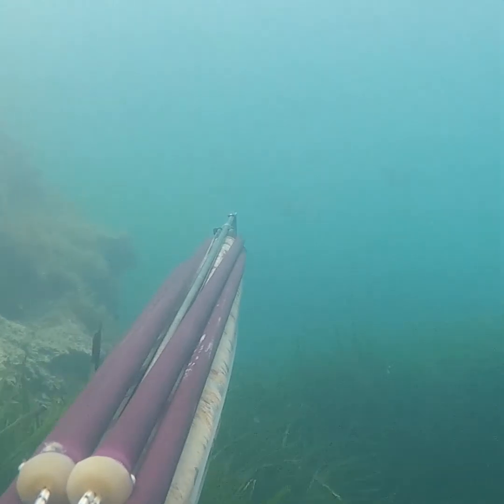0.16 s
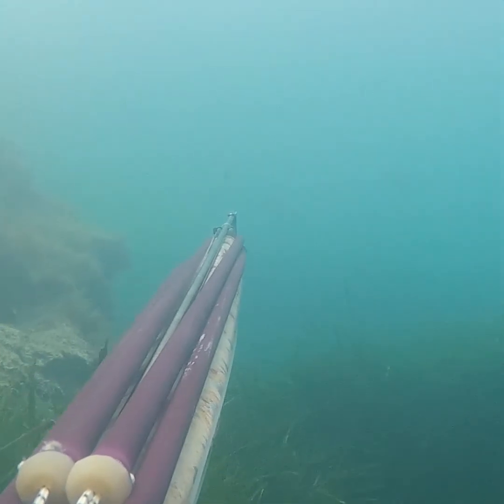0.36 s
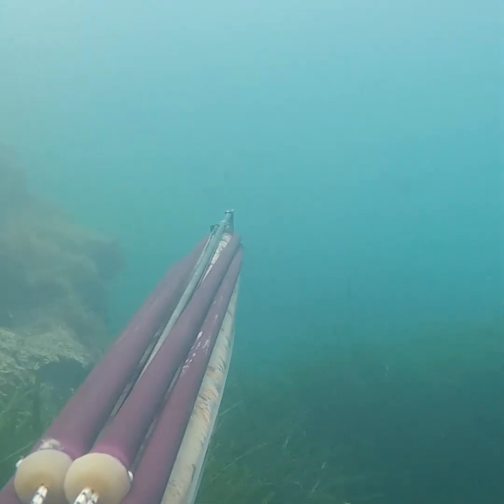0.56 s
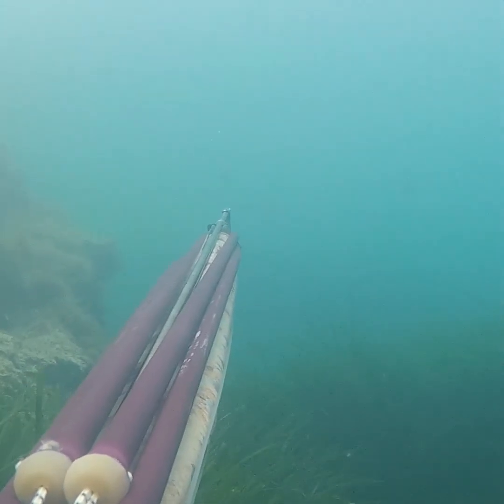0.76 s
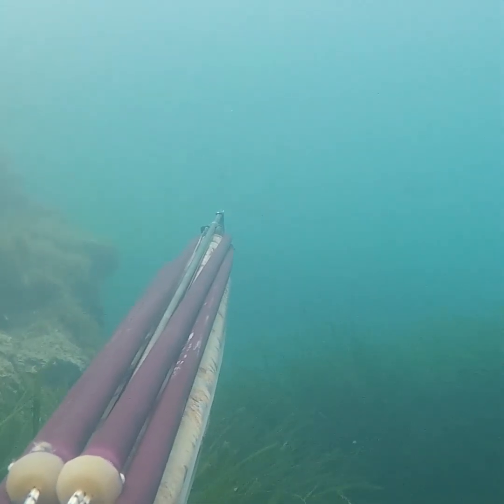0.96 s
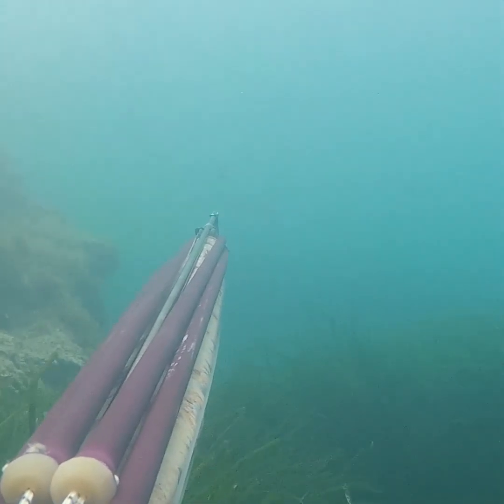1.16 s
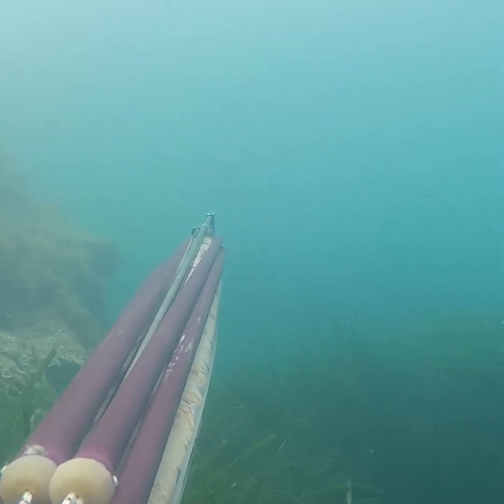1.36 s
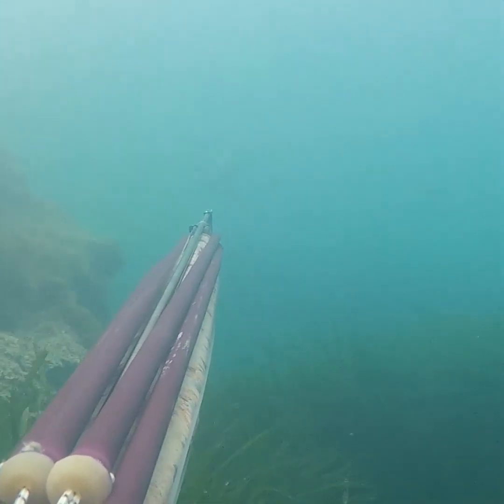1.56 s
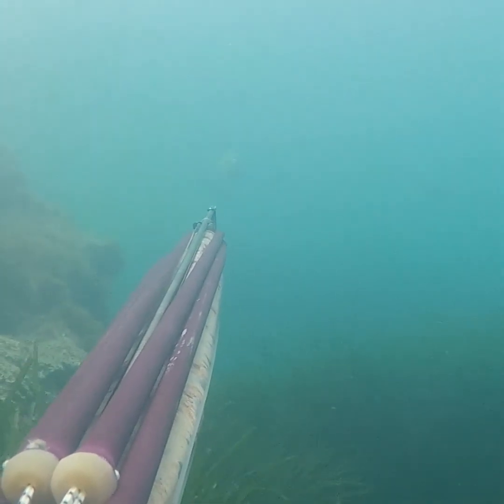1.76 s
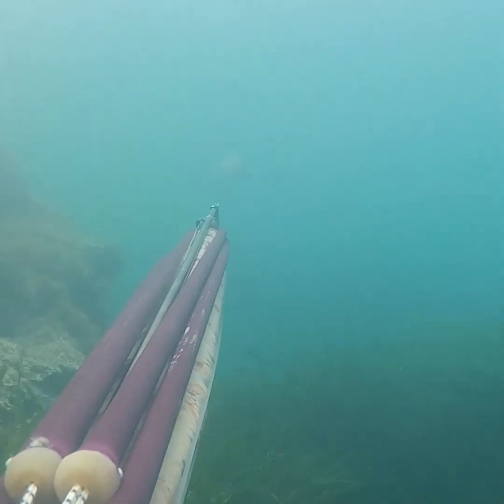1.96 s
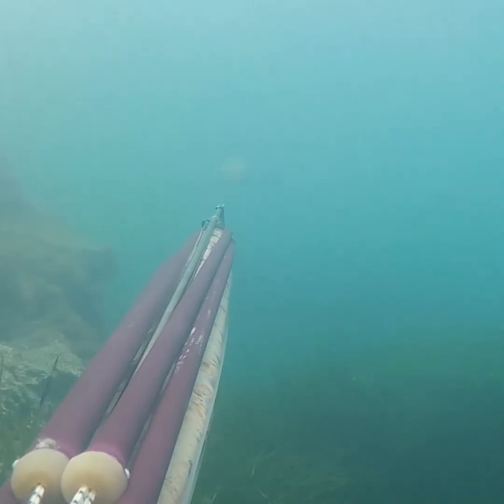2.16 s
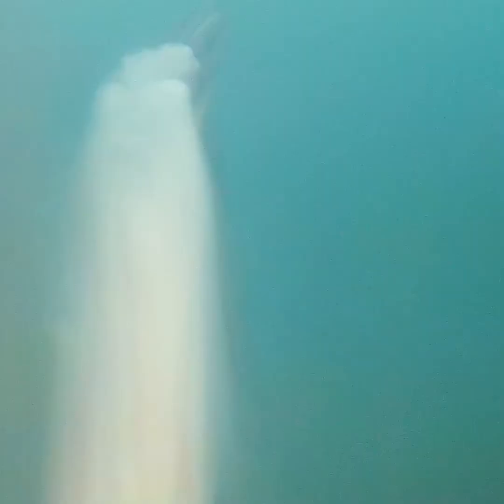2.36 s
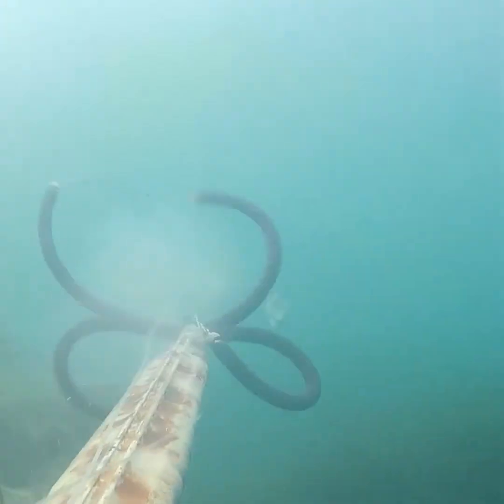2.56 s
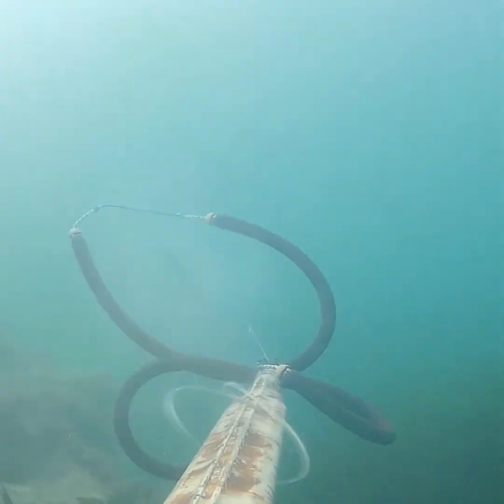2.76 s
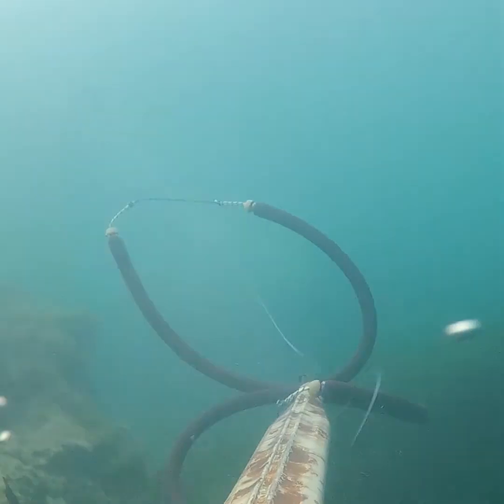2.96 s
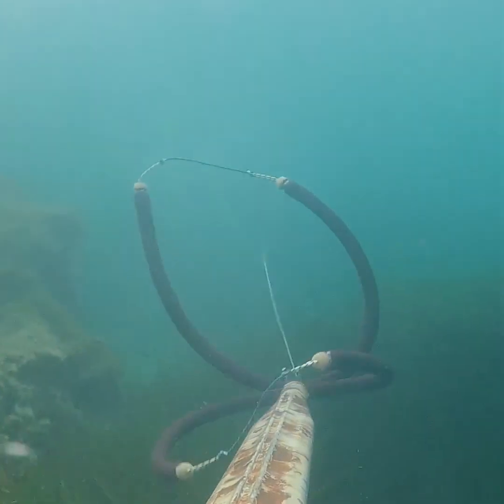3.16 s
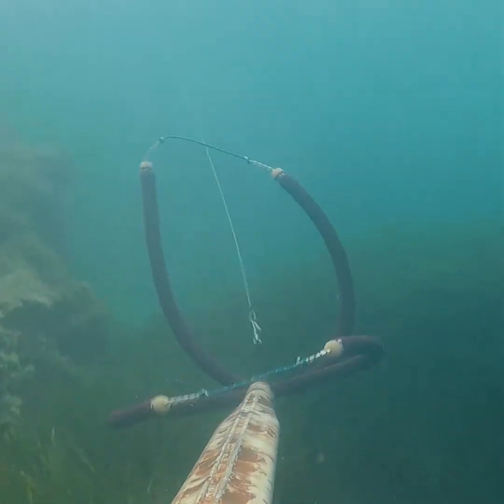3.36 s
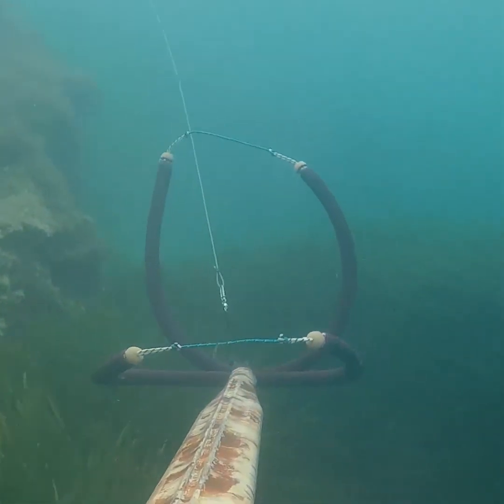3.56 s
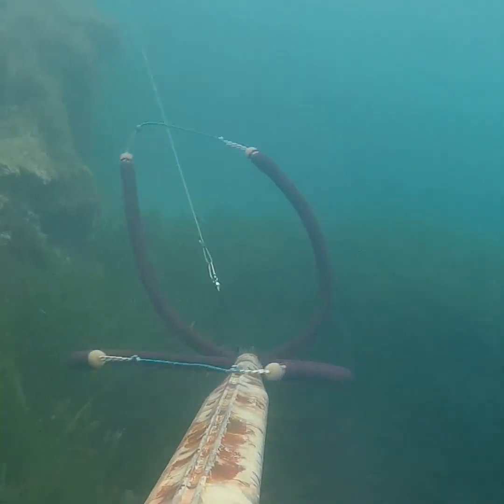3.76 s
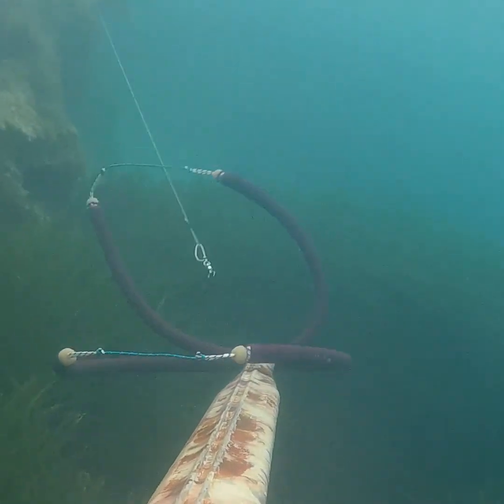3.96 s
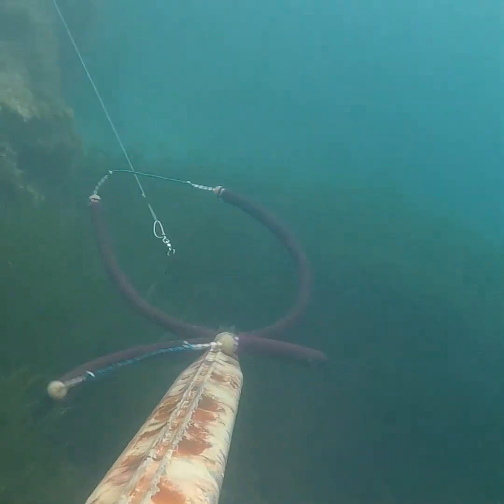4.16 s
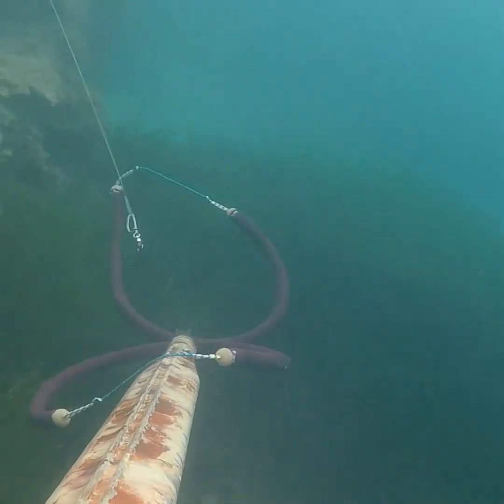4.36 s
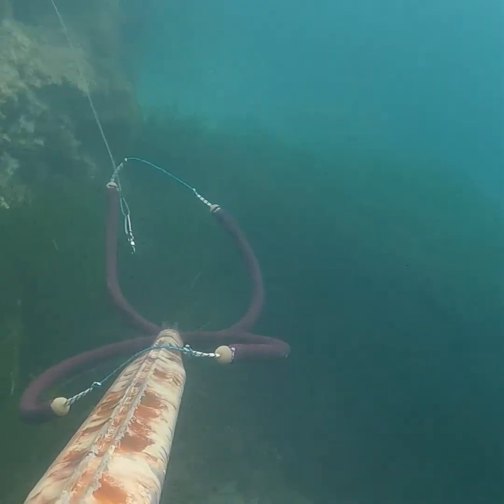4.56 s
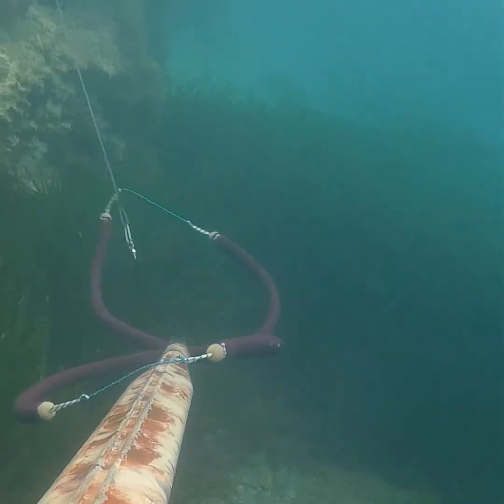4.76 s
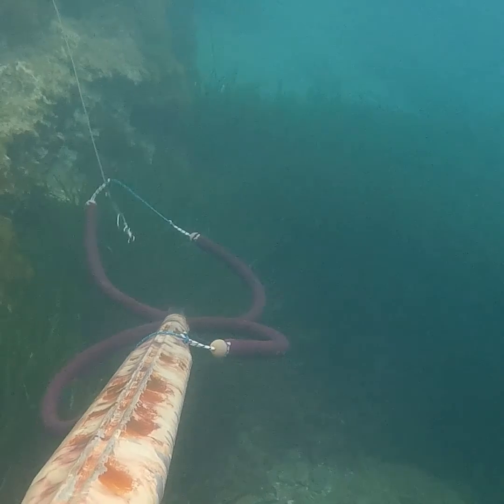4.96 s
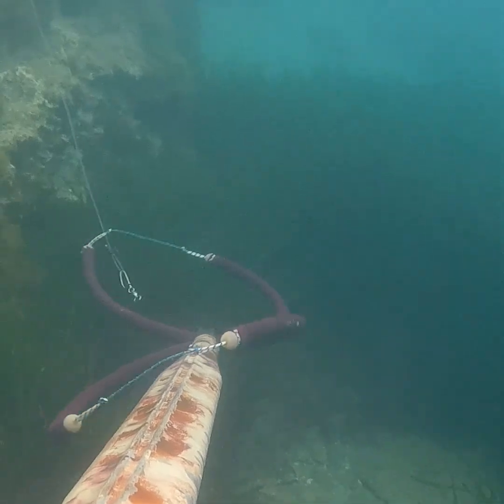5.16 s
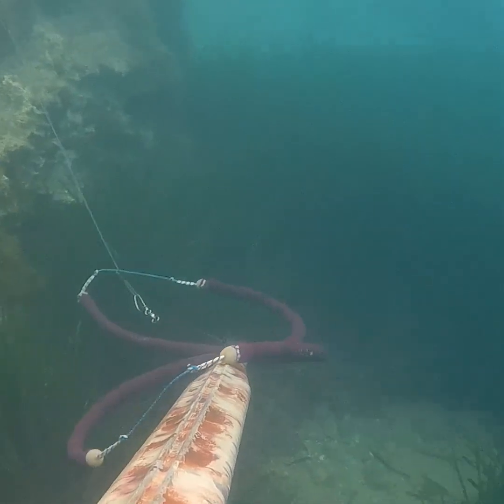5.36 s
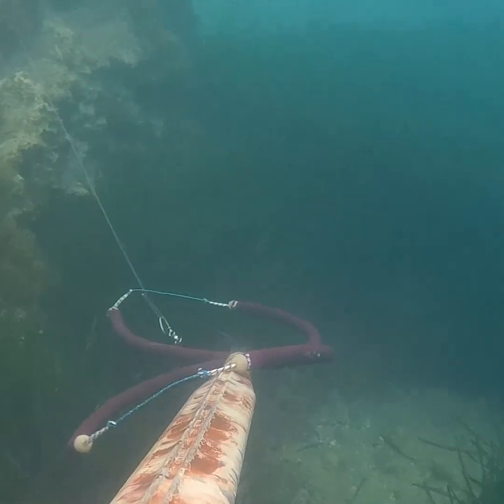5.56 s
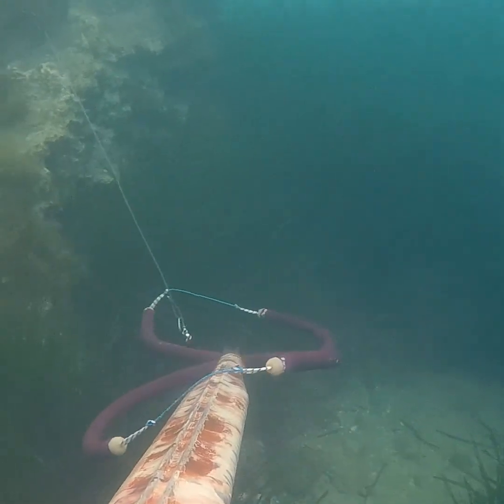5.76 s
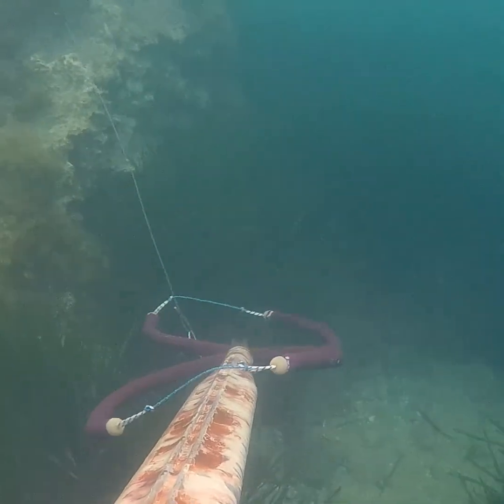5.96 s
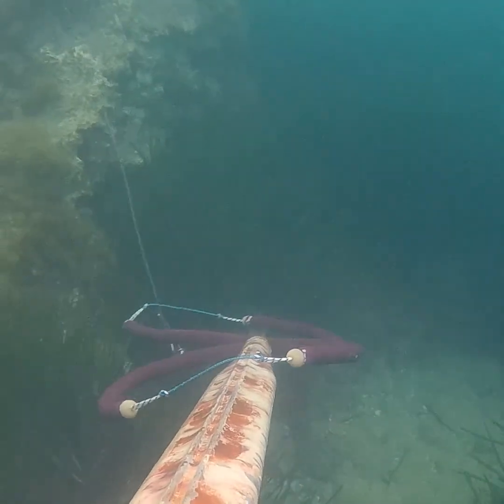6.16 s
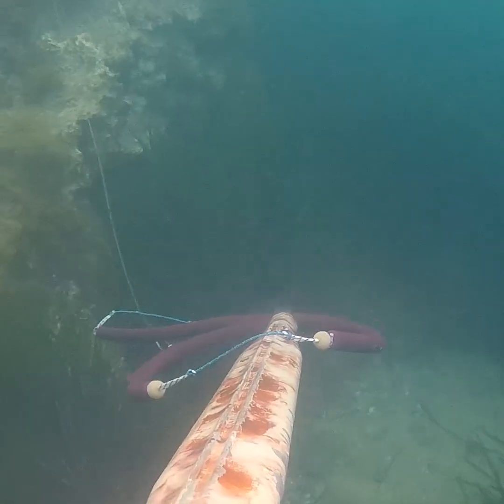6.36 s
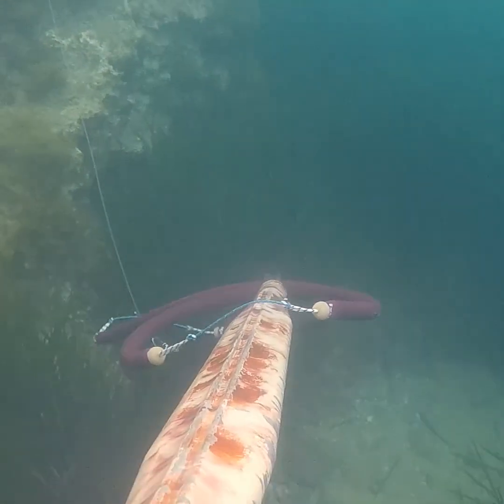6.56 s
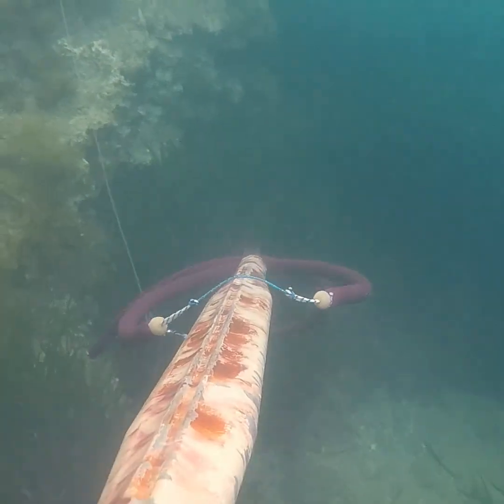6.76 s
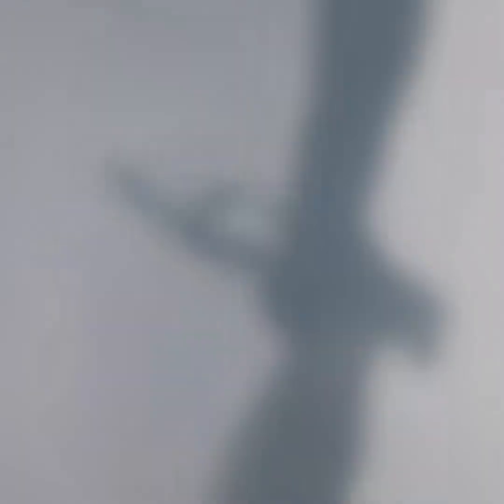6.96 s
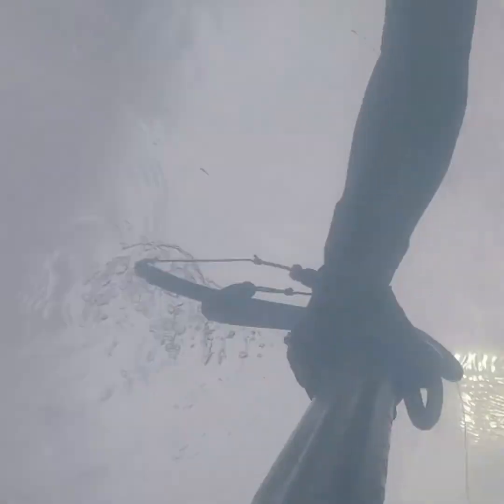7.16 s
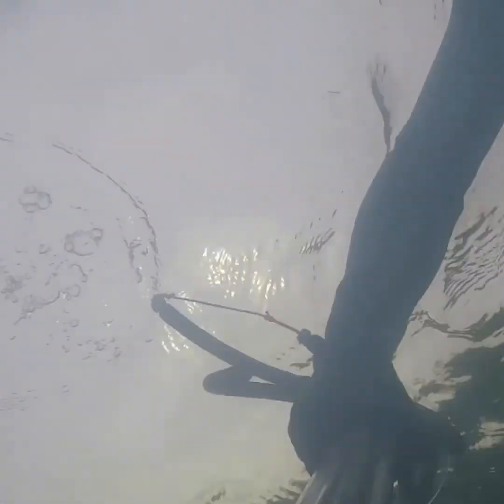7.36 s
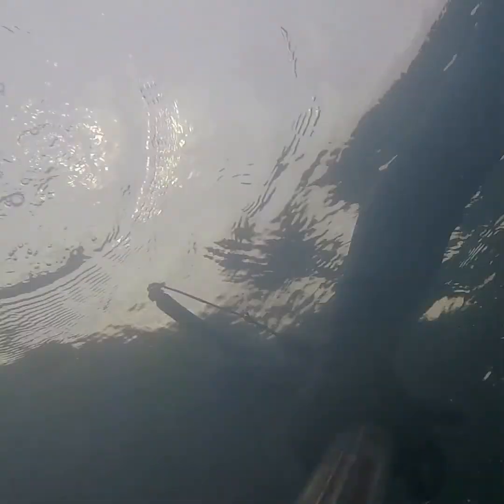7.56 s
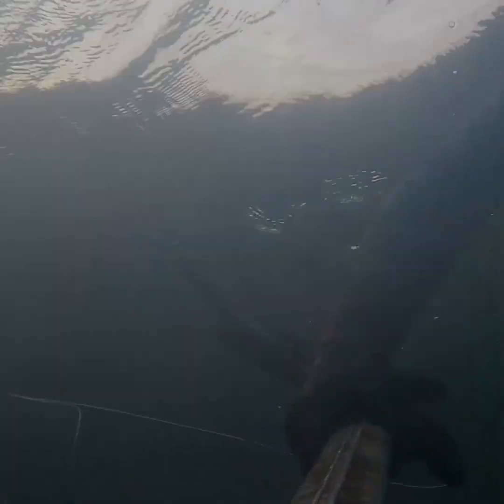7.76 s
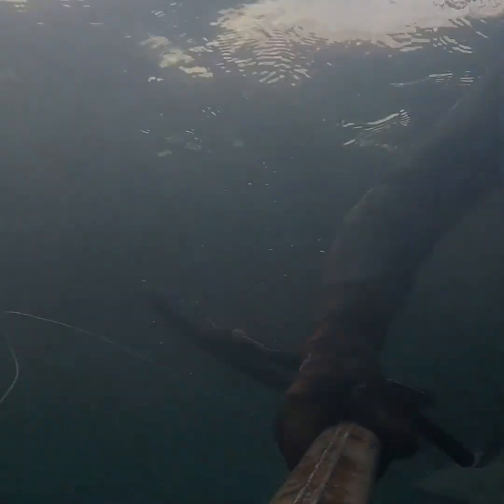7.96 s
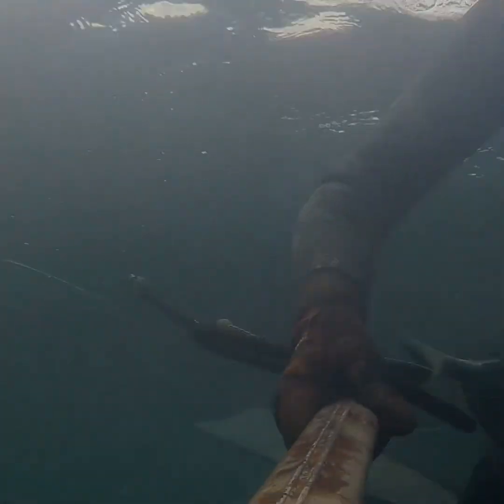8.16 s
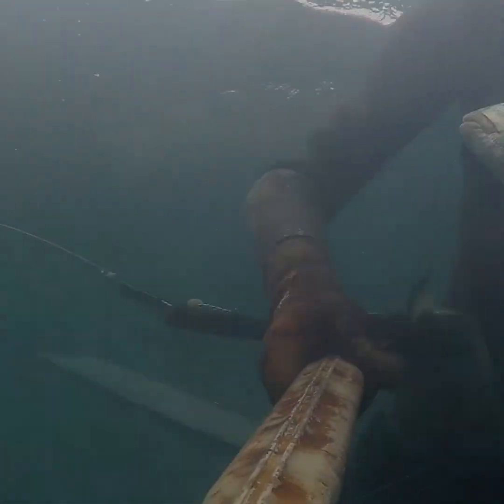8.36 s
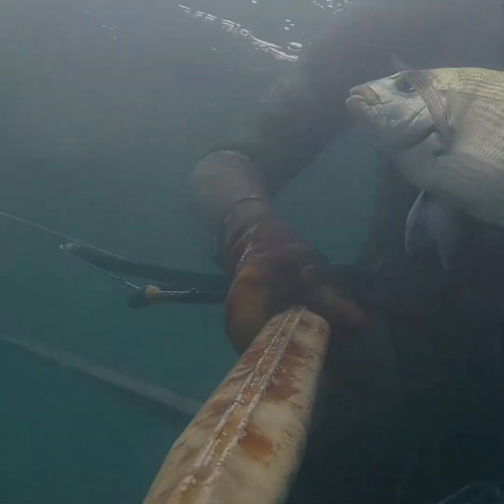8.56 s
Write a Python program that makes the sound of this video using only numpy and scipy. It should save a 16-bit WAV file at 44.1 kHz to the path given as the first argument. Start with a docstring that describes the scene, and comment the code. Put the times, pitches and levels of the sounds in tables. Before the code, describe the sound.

A microphone housing on a speargun, underwater. From 0 to 2.3 seconds, bright shrimp sizzle and scattered sharp snaps cover a quiet watery rumble. At about 2.4 the gun fires: a hard clack and a loud, rough, low roar, clipped and brief, with a churning wake and small knocks. The steady sounds drop almost to nothing, and the image narrows to mono. From about 3.3 line runs out with a fluttering hum and rasp, swelling until it stops taut at 3.8. The crackle slowly returns after 3. From 4.5 deep sagging tugs thump, with groaning rubs, ringing knocks and bubbles, thickest around 5.3 to 6. Stereo opens again near 6.5; heavy drumming surges, with an instant's dropout at 6.95. After 7.6 shrimp sound further off, while scrapes, chirping bubbles and strong knocks near 7.9 give way to small bright steel clinks from 8.2 to 8.6.

```python
"""Spearfishing, heard by two microphones in a housing on the gun: noise bursts of shrimp crackle over a water rumble.
At 2.4 s the gun fires, a roar of rough low noise; the steady sounds sink, and from 3 s slowly return.
Line runs out, humming and rasping as fluttering noise, until it snaps taut at 3.8 s.
Then the fish tugs (low sagging tones) and hands haul: rubbing, groans, knocks that ring, bubbles that chirp.
Near 7 s the sound drops out for an instant; from 7.6 s the shrimp are further off, and last, steel clinks."""
import sys
import numpy as np
from scipy import signal
from scipy.fft import rfft, irfft, next_fast_len
from scipy.io import wavfile
from scipy.ndimage import uniform_filter1d, map_coordinates

SR = 44100
rng = np.random.default_rng(int(sys.argv[2]) if len(sys.argv) > 2 else 0)


def wav_record(signal):
    """Record a signal, one row per channel, as 16-bit PCM in the file named by sys.argv[1]."""
    frames = np.transpose(np.atleast_2d(signal))
    bounded = np.clip(frames, -1, 1)
    # unit amplitude maps onto the largest positive 16-bit level
    quanta = np.round(bounded * 32767).astype(np.int16)
    wavfile.write(sys.argv[1], SR, quanta)


N = 379701  # length in samples

# In all spectra the level is per Hz and only its shape counts: the players below set the loudness.
# Spectrum of the bands whipping through the water: (f/Hz, level/dB)
WHIP_SPECTRUM = [(25, 4.5), (90, 11.5), (300, -10.5), (1100, -15), (2500, -26.5), (6000, -39), (15000, -69)]
# Spectrum of the line humming as it runs out: (f/Hz, level/dB)
LINE_HUM_SPECTRUM = [(110, 1), (220, 27), (330, 9.5), (470, 24.5), (660, 16.5), (950, -1.5), (2000, -42.5)]
# Spectrum of the line rasping as it runs out: (f/Hz, level/dB)
LINE_RASP_SPECTRUM = [(300, -10), (720, 12), (1400, -5.5), (2200, -23.5), (3200, -22.5), (12000, -71)]
# the whip grows as the spear gains speed and dies once it has left
SHOT_S, WHIP_DB, WHIP_RISE_DB_PER_S, WHIP_FALL_DB_PER_S = 2.357, 4, 478, 329
# the line runs out ever louder until it snaps taut; its hum takes a moment to set in
TAUT_S, RUN_S, RUN_ONSET_S = 3.81, 0.468, 0.037
RUN_DB, RUN_RISE_DB_PER_S, RUN_FALL_DB_PER_S = -31.5, 38, 162
# the rasp grows faster than the hum
RUN_RASP_DB, RUN_RASP_RISE_DB_PER_S = -47, 54


def shot():
    """The bands whip through the water, then the line hums out, fluttering, and rasps as it gains speed."""
    rough_noise = grains(rate=500, spread_db=2.5, t60=.012, bed_db=-6)
    whip = pair(rough_noise, WHIP_SPECTRUM, WHIP_SPECTRUM, diff_db=3)
    whip_gain = amp(WHIP_DB) * crest(SHOT_S, WHIP_RISE_DB_PER_S, WHIP_FALL_DB_PER_S)

    flutter = grains(rate=300, spread_db=1.5, t60=.05, bed_db=-6)
    hum = pair(flutter, LINE_HUM_SPECTRUM, LINE_HUM_SPECTRUM, diff_db=-5)
    onset = np.clip((clock() - (TAUT_S - RUN_S)) / RUN_ONSET_S, 0, 1)
    hum_gain = amp(RUN_DB) * crest(TAUT_S, RUN_RISE_DB_PER_S, RUN_FALL_DB_PER_S) * onset
    rasp = pair(flutter, LINE_RASP_SPECTRUM, LINE_RASP_SPECTRUM, diff_db=1)
    rasp_gain = amp(RUN_RASP_DB) * crest(TAUT_S, RUN_RASP_RISE_DB_PER_S, RUN_FALL_DB_PER_S)
    return whip_gain * whip + hum_gain * hum + rasp_gain * rasp


# Line and gloves sliding on the gun:
# (t/s, length/s, scraping level/dB before the trim below, groan level/dB)
RUB_STROKES = [(2.404, 0.089, -45, -22.5), (2.605, 0.099, -36.5, -37.5), (2.69, 0.083, -49.5, -59.5),
               (2.869, 0.096, -50.5, -47.5), (3.908, 0.035, -51, -26.5), (4.042, 0.244, -45, -40.5),
               (4.467, 0.068, -53, -21), (4.741, 0.093, -34.5, -28), (4.844, 0.12, -48, -31),
               (5.053, .123, -34, -24), (5.321, 0.084, -34, -32), (5.532, 0.093, -29, -28.5),
               (5.642, 0.14, -26.5, -20), (5.791, 0.071, -29, -17.5), (5.86, 0.25, -74, -28),
               (6.263, 0.193, -33, -36.5), (6.692, 0.15, -26, -38), (6.947, .2, -25.5, -21),
               (7.204, 0.098, -24, -17.5), (7.533, .06, -32.5, -41), (7.683, 0.038, -17, -32),
               (7.863, 0.046, -18, -28), (7.937, 0.045, -23, -34), (8.033, 0.069, -23, -23),
               (8.106, 0.11, -17.5, -38)]
# Spectrum of the barrel's groan: (f/Hz, level/dB)
GROAN_SPECTRUM = [(90, -33), (150, -2.5), (214, 4.5), (255, -6.5), (303, 6), (370, -18.5), (700, -69)]
# Spectrum of the gun, as the sum of both microphones: (f/Hz, level/dB)
GUN_SUM_SPECTRUM = [(150, -14), (250, -2.5), (302, 0), (404, -3.5), (774, -8.5), (984, -16.5),
                    (1320, -12.5), (1560, -18), (2900, -20), (4300, -34.5), (5950, -30), (15000, -68.5)]
# Spectrum of the gun, as the difference of the microphones: (f/Hz, level/dB)
GUN_DIFF_SPECTRUM = [(150, -8.5), (300, 6), (420, -9), (570, -3.5), (660, 6), (770, -17), (1000, 1),
                     (1150, -2), (1600, -29), (2500, -20), (4700, -38.5), (15000, -63)]
STROKE_SCRAPE_TRIM_DB = -4
# light chafing on the gun: the slack bands settle after the shot; it returns as the line comes taut
CHAFE_GROAN_DB, CHAFE_SCRAPE_DB = -47, -44.5
CHAFE_FALL_DB_PER_S, CHAFE_RETURN_S = 29.5, 1.0
# share of a stroke's energy that rings as bubbles; share by which the groan drifts, and how often
BUBBLE_SHARE, GRIP_DRIFT, GRIP_SHIFTS_PER_S = .55, .04, 12


def handling():
    """Line and gloves stick and slip on the groaning barrel, shed bubbles, and swish softly as they chafe."""
    strokes = np.zeros((2, N))
    for s, length, scrape_db, groan_db in RUB_STROKES:
        shape = signal.windows.tukey(int(max(length, .01) * SR), .5)
        add(strokes, s, amp([[scrape_db], [groan_db]]) * shape)
    stroke_scrape, stroke_groan = strokes
    _, haul_groan, haul_scrape = hauling()
    bands_settling = crest(SHOT_S, WHIP_RISE_DB_PER_S, CHAFE_FALL_DB_PER_S)
    chafe = (clock() > SHOT_S) * (sinking(0, 0, CHAFE_RETURN_S) + bands_settling)

    # the groan's pitch drifts as the grip shifts
    groan = waver(rush(GROAN_SPECTRUM, GROAN_SPECTRUM, diff_db=3.0), GRIP_DRIFT, GRIP_SHIFTS_PER_S)
    groan_gain = stroke_groan + haul_groan + amp(CHAFE_GROAN_DB) * chafe

    slip_noise = grains(rate=300, spread_db=2.8, t60=.04, bed_db=-12)
    slips = pair(slip_noise, GUN_SUM_SPECTRUM, GUN_DIFF_SPECTRUM, diff_db=8)
    wet_scraping = np.sqrt(1 - BUBBLE_SHARE) * slips + np.sqrt(BUBBLE_SHARE) * gurgle(count=2600)
    scrape_gain = amp(STROKE_SCRAPE_TRIM_DB) * stroke_scrape + haul_scrape

    swish_noise = grains(rate=35, spread_db=2.1, t60=.08, bed_db=-13)
    swish = pair(swish_noise, GUN_SUM_SPECTRUM, GUN_DIFF_SPECTRUM, diff_db=8, tilt_db=-2)
    return groan_gain * groan + scrape_gain * wet_scraping + amp(CHAFE_SCRAPE_DB) * chafe * swish


# Hauls that sweep the gun through the water:
# (middle t/s, length/s, wall drumming level/dB, barrel groan level/dB, scraping level/dB)
HAUL_SWELLS = [(4.891, 0.21, -16.5, -27.5, -41.5), (5.862, 1.36, -15.5, -46.5, -38.5),
               (6.817, 0.76, -10.5, -27.5, -44), (7.145, 0.5, -17, -25, -37.5),
               (7.879, 1.26, -12.5, -21.5, -33.5), (8.472, 0.81, -20.5, -25, -39)]


def hauling():
    """Gains of drumming, groan and scraping: each haul swells and ebbs smoothly."""
    out = np.zeros((3, N))
    for s, length, drum_db, groan_db, scrape_db in HAUL_SWELLS:
        swell = signal.windows.hann(int(length * SR))
        add(out, s - length / 2, amp([[drum_db], [groan_db], [scrape_db]]) * swell)
    return out


# Spear, band ends and line striking the gun:
# (t/s, level/dB that clack and ring are set against, brightness/dB per octave above 1 kHz)
GUN_KNOCKS = [(2.329, -13.5, 8), (2.366, 5, 4.5), (2.378, -7.5, -6), (2.404, -11, -2), (2.457, -18.5, -1),
              (2.528, -16.5, -5), (2.651, -16, -8), (3.281, -28, -0.5), (3.303, -35.5, 2), (3.388, -39, -5),
              (3.903, -20.5, -0.5), (4.2, -26.5, 4), (4.261, -25, -9), (4.301, -23, -2.5), (4.479, -19, -5),
              (4.762, -18, -26), (4.891, -9.5, -11), (4.946, -22.5, -9), (4.994, -28, 8.5), (5.641, -17, 5),
              (5.668, -16.5, 6), (5.716, -8, -5), (6.689, -12.5, -8.5), (6.717, -13.5, 3.5),
              (6.79, -24, -14), (6.961, -6.5, -20), (6.994, -13, -2.5), (7.174, -10, -12), (7.227, -19, -2),
              (7.255, -11.5, -8.5), (7.719, -20, -4.5), (7.799, -13, -2), (7.883, -3, 3),
              (7.963, -0.5, 1.5), (8.036, -12.5, -14), (8.139, -16.5, 5.5)]
# What the gun rings with at every knock: (f/Hz, level/dB against the knock, before brightness and chance)
GUN_RING_MODES = [(630, -19.5), (868, -10.5), (1112, -10.5), (1308, -11), (1720, -12.5), (2370, -20),
                  (2910, -22.5)]
# Tugs and recoil that flex the gun: (t/s, peak level/dB, middle pitch f/Hz, swell time/s)
GUN_THUMPS = [(2.325, -6, 58.3, 0.022), (3.391, -22, 88.5, 0.0044), (3.902, -14, 93, 0.011),
              (4.48, -2.5, 72.5, 0.013), (4.886, -15, 220, 0.019), (5.125, -21, 206, 0.016),
              (5.351, -1, 89, 0.012), (5.35, -13, 202.7, 0.016), (5.605, -8.5, 85.5, 0.0044),
              (5.728, -7.5, 97.9, 0.0172), (5.804, 1, 176.3, 0.017), (5.843, -2, 139, 0.011),
              (6.031, -12, 214, 0.01), (6.383, -9.5, 59.6, 0.0077), (6.599, -4, 82.4, 0.011),
              (6.772, 0.5, 75.2, 0.02), (6.851, -7, 77.7, 0.028), (6.954, -2, 92.4, 0.033),
              (7.666, -13, 303.6, 0.015), (7.809, -7, 95.5, 0.023), (8.041, -5.5, 116.9, 0.035),
              (8.179, -5, 108.7, 0.025)]
# the dry clack against the knock's level; how long the ring lasts (cycles)
CLACK_DB, RING_CYCLES = -2, 7.2
# share by which a thump's pitch sags as the gun relaxes
THUMP_SAG = 0.22


def knocks():
    """Hard contacts clack through the gun and ring briefly; tugs flex it at a low, sagging pitch."""
    out = np.zeros((2, N))
    for s, db, tilt_db in GUN_KNOCKS:
        blow = burst(rise=.003, t60=.035, echo_db=-24, echo_t60=.13)
        clack = pair(blow, GUN_SUM_SPECTRUM, GUN_DIFF_SPECTRUM, diff_db=9.5, tilt_db=tilt_db)
        add(out, s, amp(db + CLACK_DB) * clack / np.abs(clack[0]).max())
        for hz, mode_db in GUN_RING_MODES:
            # each ring differs a little in level, pitch and sign
            brightness_db = tilt_db * np.log2(max(hz / 1000, 1))
            level_db = db + mode_db + brightness_db + rng.normal(0, 2)
            sign = rng.choice([-1, 1])
            add(out, s, sign * amp(level_db) * ring(hz * rng.normal(1, .012), RING_CYCLES))
    t = np.arange(SR // 3) / SR
    for s, db, hz, swell in GUN_THUMPS:
        pitch = hz * (1 + THUMP_SAG * (np.exp(-t / swell / 2) - .5))
        phase = 2 * np.pi * np.cumsum(pitch) / SR
        shape = t / swell * np.exp(1 - t / swell)
        add(out, s, amp(db) * shape * np.array([np.sin(phase), np.cos(phase)]))
    return out


# Steel fittings of the line clinking: (t/s, peak level/dB before the trim below)
STEEL_CLINKS = [(8.2116, -25.5), (8.348, -25), (8.464, -17.5), (8.49, -26.5), (8.5699, -20)]
# The bright, rough colour of the steel fittings: (f/Hz, level/dB)
STEEL_SPECTRUM = [(600, -2.5), (1900, -12.5), (2550, 1.5), (3050, -7.5), (3900, -7.5), (4800, -14.5),
                  (12000, -33)]
CLINK_TRIM_DB = -0.5


def clinks():
    """Small steel fittings on the line rattle against each other: bright bursts of noise."""
    out = np.zeros((2, N))
    for s, db in STEEL_CLINKS:
        blow = burst(rise=.003, t60=.035, echo_db=-24, echo_t60=.1)
        rattle = pair(blow, STEEL_SPECTRUM, STEEL_SPECTRUM, diff_db=2)
        add(out, s, amp(db + CLINK_TRIM_DB) * rattle / np.abs(rattle[0]).max())
    return out


# Single large bubbles breaking loose from the gun and the arms:
# (t/s, level/dB before the boost below, starting pitch f/Hz)
BUBBLE_PLOPS = [(2.558, -38, 502), (4.202, -29, 587), (4.873, -24, 456), (5.546, -29, 864),
                (5.644, -19, 1722), (5.683, -22.5, 1430), (5.697, -21, 870), (6.534, -27, 1446),
                (6.552, -34, 1330), (6.689, -23, 1693), (7.036, -25, 904), (7.086, -24.5, 718),
                (7.254, -19, 1280), (7.594, -32.5, 664), (7.64, -17.5, 1284), (7.691, -33.5, 1162),
                (7.913, -17, 1116), (8.163, -18, 1200), (8.18, -18.5, 1337)]
PLOP_BOOST_DB = 4.5
# a bubble's life (cycles) and the share by which its pitch climbs in that time
PLOP_CYCLES, PLOP_RISE = 8, .025


def plops():
    """Each large bubble rings once with a short upward chirp."""
    out = np.zeros((2, N))
    for s, db, hz in BUBBLE_PLOPS:
        add(out, s, amp(db + PLOP_BOOST_DB) * ring(hz, PLOP_CYCLES, PLOP_RISE))
    return out


def gurgle(count):
    """Crowds of small bubbles shaken loose, each a short rising ring; their sum signal has rms 1."""
    out = np.zeros((2, N))
    for when, pitch, size, life in rng.random((count, 4)):
        bubble = ring(hz=450 * 4 ** pitch, cycles=2 + 7 * life, rise=PLOP_RISE)
        add(out, when * N / SR, amp(16 * size) * bubble)
    return out / out[0].std()


# Spectrum of eddies surging round the housing: (f/Hz, level/dB)
SURGE_SPECTRUM = [(8, -14.5), (27, 12), (50, -1), (90, -17), (500, -35), (1500, -73.5)]
# Spectrum of the housing wall drumming: (f/Hz, level/dB)
DRUM_SPECTRUM = [(30, -26.5), (62, 1), (86, 8.5), (108, -1.5), (135, -9.5), (280, -24), (700, -66.5)]
# the shot leaves a churning wake
WAKE_DB, WAKE_FALL_DB_PER_S = -17.5, 55


def water():
    """Eddies surge round the housing and make its wall drum, more so in the shot's wake and with each haul."""
    wake = amp(WAKE_DB) * crest(SHOT_S, WHIP_RISE_DB_PER_S, WAKE_FALL_DB_PER_S)
    surge_gain = np.hypot(sinking(-21, -20.5, BASS_RETURN_S), wake)
    haul_drum, _, _ = hauling()
    drum_gain = np.hypot(sinking(-29, -23, BASS_RETURN_S), wake + haul_drum)
    eddies = pair(rng.standard_normal((2, N)), SURGE_SPECTRUM, SURGE_SPECTRUM, diff_db=-4.5)
    drumming = rush(DRUM_SPECTRUM, DRUM_SPECTRUM, diff_db=-5.5)
    return surge_gain * eddies + drum_gain * drumming


# Near shrimp: (t/s, peak level/dB, brightness/dB per octave above 1 kHz)
NEAR_SNAPS = [(0.0519, -12, -11.5), (0.1266, -2, -4), (0.2462, -15, -1.5), (0.4429, -10.5, -9.5),
              (0.92, -4.5, -5), (1.1654, -11, -8), (1.2686, -6.5, -1), (1.507, -17.5, 2),
              (1.558, -16.5, 14), (1.7602, -8.5, -5.5), (1.8993, -6, -9.5), (1.9797, -6.5, -4.5),
              (2.031, -14, -7.5), (2.229, -15, -3.5), (2.272, -8.5, -2), (5.232, -23, 0),
              (5.9693, -23.5, 1), (6.1648, -20, 7), (6.893, -15, -2.5), (7.014, -10, 1),
              (7.469, -8.5, -1.5)]
# Spectrum of the far sizzle, as the sum of both microphones: (f/Hz, level/dB)
SIZZLE_SPECTRUM = [(300, -3), (910, -7), (1680, -5.5), (1940, 2.5), (2170, -3.5), (2550, -2), (3400, -9),
                   (3750, -4.5), (5510, -1), (9220, -11), (12900, -25.5), (14000, -63.5)]
# Spectrum of nearer shrimp, as the sum of both microphones: (f/Hz, level/dB)
SEA_SUM_SPECTRUM = [(300, -35.5), (1130, -24.5), (1490, -2), (1940, 4.5), (2170, -13), (2440, 5.5),
                    (3330, -11.5), (3730, 2), (4470, -8.5), (5530, 4), (9180, -16.5), (15000, -48.5)]
# Spectrum of all shrimp, as the difference of the microphones: (f/Hz, level/dB)
SEA_DIFF_SPECTRUM = [(200, -8), (1450, -7.5), (2000, -10), (2500, 3), (3700, -17), (5300, 2), (6700, -8),
                     (9300, -17), (15000, -42)]
# Spectrum of the far sizzle while the image is narrow: (f/Hz, level/dB)
SEA_MONO_SPECTRUM = [(800, -32), (1700, 2.5), (2400, -7), (3100, -2.5), (4000, -12), (5100, -7.5),
                     (6100, 1.5), (7200, -7.5), (9300, -5.5), (15000, -39)]
# near the surface the shrimp on the rocks are further off
ASCENT_S, ASCENT_TAKES_S, ASCENT_LOSS_DB = 7.6, 0.17, 6


def shrimp(width):
    """Countless far snaps fuse into a sizzle; nearer ones crackle dully from the rocks or tick thinly in the open."""
    far = grains(rate=420, spread_db=4.2, t60=.011, bed_db=-8)
    sheltered = grains(rate=50, spread_db=2.0, t60=.022, bed_db=-17)
    in_open = grains(rate=35, spread_db=2.8, t60=.007, bed_db=-17)
    sizzle = pair(far, SIZZLE_SPECTRUM, SEA_DIFF_SPECTRUM, diff_db=-4.0)
    crackle = pair(sheltered, SEA_SUM_SPECTRUM, SEA_DIFF_SPECTRUM, diff_db=5.5, tilt_db=-6.5)
    ticks = pair(in_open, SEA_SUM_SPECTRUM, SEA_DIFF_SPECTRUM, diff_db=6.5, tilt_db=4.5)
    out = width * (amp(3.5) * sizzle + amp(3.0) * crackle + amp(-2.0) * ticks)
    # as the stereo image narrows, a mono sizzle takes over
    mono_sizzle = pair(far, SEA_MONO_SPECTRUM, SEA_MONO_SPECTRUM, 0)[0]
    out[0] += amp(5.0) * np.sqrt(np.abs(1 - width ** 2)) * mono_sizzle
    risen = np.clip((clock() - ASCENT_S) / ASCENT_TAKES_S, 0, 1)
    out *= sinking(-42.5, -49, TREBLE_RETURN_S) * amp(-ASCENT_LOSS_DB * risen)
    for s, db, tilt_db in NEAR_SNAPS:
        crack = burst(rise=.0001, t60=0.014, echo_db=-20, echo_t60=0.08)
        snap = pair(crack, SEA_SUM_SPECTRUM, SEA_DIFF_SPECTRUM, diff_db=1.0, tilt_db=tilt_db)
        add(out, s, amp(db) * snap / np.abs(snap[0]).max())
    return out


# after the shot steady sounds sink, stay down, then come back, the bass sooner than the treble
SINK_DB, SINK_TIME_S, RETURN_AT_S = 37, .07, 3.05
BASS_RETURN_S, TREBLE_RETURN_S, RETURN_EASE = 1.69, 2.61, 1.24


def sinking(waiting_db, swimming_db, return_s):
    """Gain of a steady sound: it sinks at the shot and eases back, from lying in wait to swimming."""
    sunk = 1 - np.exp(-np.maximum(clock() - SHOT_S, 0) / SINK_TIME_S)
    still_down = np.clip(1 - (clock() - RETURN_AT_S) / return_s, 0, 1) ** RETURN_EASE
    return amp(waiting_db + sunk * (swimming_db - waiting_db - SINK_DB * still_down))


def crest(s, rise_db_per_s, fall_db_per_s):
    """A gain that climbs to 1 at time s and dies away."""
    t = clock() - s
    return amp(np.minimum(rise_db_per_s * t, -fall_db_per_s * t))


def ring(hz, cycles, rise=0):
    """A brief ring as (sum, difference) of the microphones; its pitch climbs by the share rise per life."""
    lives = np.arange(int(4 * cycles * SR / hz)) * hz / SR / cycles
    phase = 2 * np.pi * cycles * lives * (1 + rise * lives / 2)
    shape = (1 - np.exp(-6 * lives)) * np.exp(-lives)
    return shape * np.array([np.sin(phase), np.sqrt(2900 / hz) * np.cos(phase)])


def burst(rise, t60, echo_db, echo_t60):
    """A blow scattered into a quick decay and a weaker, longer one (times in seconds)."""
    t = np.arange(SR // 5) / SR
    decay = amp(-60 * t / t60) + amp(echo_db - 60 * t / echo_t60)
    return (1 - np.exp(-t / rise)) * decay * rng.standard_normal((2, len(t)))


def grains(rate, spread_db, t60, bed_db):
    """Random short bursts (rate per second), a few large and many small, over a smooth bed."""
    starts = rng.random(N) < rate / SR
    sizes = amp(spread_db * np.minimum(rng.exponential(size=N), 5)) * starts
    t = np.arange(SR // 10) / SR
    power = np.abs(signal.fftconvolve(sizes ** 2, amp(-60 * t / t60) ** 2)[:N])
    return np.sqrt(power / power.mean() + amp(bed_db) ** 2) * rng.standard_normal((2, N))


def rush(common, apart, diff_db):
    """Turbulent noise coloured by a spectrum, its slow swells evened out."""
    x = pair(rng.standard_normal((2, N)), common, apart, 0)
    power = np.abs(uniform_filter1d(x ** 2, size=SR // 8, axis=-1))
    return x / np.sqrt(power + 1e-6) * amp([[0], [diff_db]])


def waver(x, share, rate):
    """The pitch of a sound drifts at random by about a share, some times a second."""
    drift = map_coordinates(rng.standard_normal(int(N / SR * rate) + 2), [clock() * rate])
    place = np.cumsum(1 + share * drift) % N
    return np.array([np.interp(place, np.arange(N), channel) for channel in x])


def pair(drive, common, apart, diff_db, tilt_db=0):
    """Sum (rms 1) and difference of two close microphones; the direct part of the difference leads by 1/4 cycle."""
    n = drive.shape[-1]
    m = 2 * next_fast_len(n // 2 + 2048, True)
    direct, diffuse = rfft(drive, m)
    first = response(common, m, tilt_db)
    second = first if apart is common else response(apart, m, tilt_db)
    spectra = [direct * first, (1j * direct + 2.0 * diffuse) * second]
    return unit(irfft(spectra, m)[:, :n]) * amp([[0], [diff_db]])


# The housing's own resonances: (f/Hz, width/Hz, level/dB over the rest)
HOUSING_MODES = [(886.4, 7.9, 5.5), (1103, 24, -1.5), (1318, 21, 7), (1473, 73, 7), (3115, 85, 6)]


def response(points, m, tilt_db=0):
    """Causal filter for a spectrum on an FFT of length m, tilted per octave above 1 kHz, with housing resonances."""
    size = 2 ** 14
    hz = np.fft.rfftfreq(size, 1 / SR) + 1
    f, db = np.transpose(points)
    level = np.interp(np.log(hz), np.log(f), db) + tilt_db * np.log2(np.maximum(hz / 1000, 1))
    level += sum(peak_db / (1 + (2 * (hz - centre) / width) ** 2) for centre, width, peak_db in HOUSING_MODES)
    # folding the cepstrum puts the filter's energy as early as possible
    cepstrum = irfft(np.log(amp(np.maximum(level, -100))))
    cepstrum[1:size // 2] *= 2
    cepstrum[size // 2 + 1:] = 0
    return rfft(irfft(np.exp(rfft(cepstrum))), m)


def amp(db):
    """Decibels to a plain factor."""
    return 10 ** (np.asarray(db) / 20)


def unit(x):
    """Each channel at rms 1."""
    return x / np.sqrt(np.mean(x ** 2, axis=-1, keepdims=True) + 1e-20)


def clock():
    """Time of each sample in seconds."""
    return np.arange(N) / SR


def curves(rows):
    """One value per sample for each column after the time."""
    s, *cols = np.transpose(rows)
    return [np.interp(clock(), s, c) for c in cols]


def add(track, s, sound):
    """Mix a sound in at time s."""
    part = track[:, round(s * SR):][:, :sound.shape[-1]]
    part += sound[..., :part.shape[-1]]


# The stereo image folds to mono and opens again: (t/s, width level/dB, lean to the left 0-1)
STEREO_WIDTH = [(2.65, 0, .07), (3.2, -15, 0), (4, -50, 0), (5.95, -50, 0), (6.15, -15, 0), (6.6, 0, .35),
                (8.15, 0, .35), (8.6, -11, .2)]


def scene():
    """All sources as sum and difference, opened into left and right."""
    width_db, lean = curves(STEREO_WIDTH)
    width = np.minimum(amp(width_db), 1)
    common, apart = shot() + handling() + knocks() + clinks() + plops() + water() + shrimp(width)
    return np.array([common * (1 + lean) + width * apart, common * (1 - lean) - width * apart])


# all sound drops out for an instant
GAP_MIDDLE_S, GAP_HALF_S = 6.945, .005
TOP_HZ = 15940  # band limit


def record(dry):
    """The sound drops out once; loud peaks flatten at full scale; nothing passes above the band limit."""
    clipped = dry / (1 + np.abs(dry) ** 8) ** (1 / 8)
    gap = 1 - np.exp(-((clock() - GAP_MIDDLE_S) / GAP_HALF_S) ** 2)
    in_band = np.fft.rfftfreq(N, 1 / SR) < TOP_HZ
    return irfft(rfft(clipped * gap) * in_band, N)


dry = scene()
out = record(dry)
wav_record(out)
```